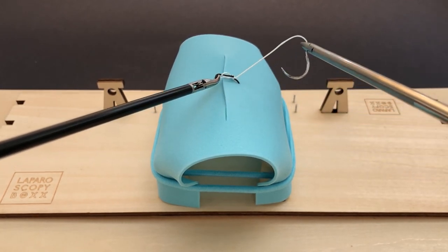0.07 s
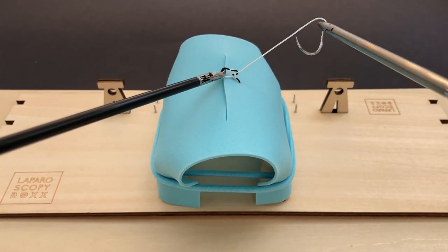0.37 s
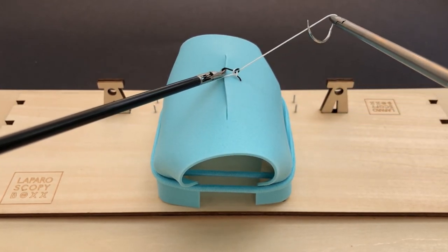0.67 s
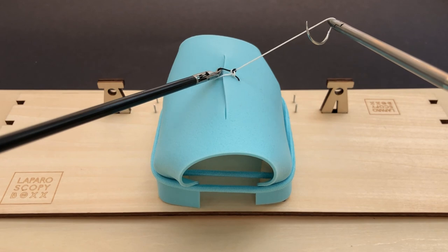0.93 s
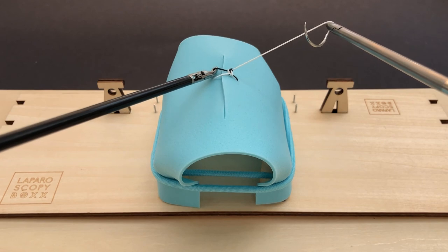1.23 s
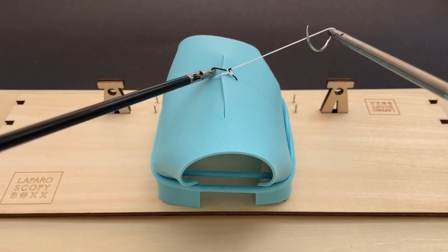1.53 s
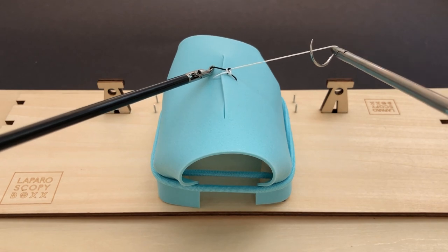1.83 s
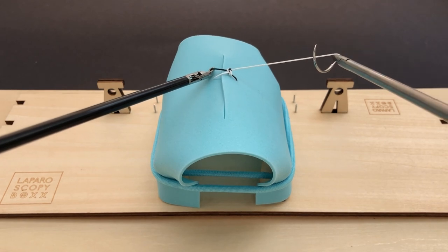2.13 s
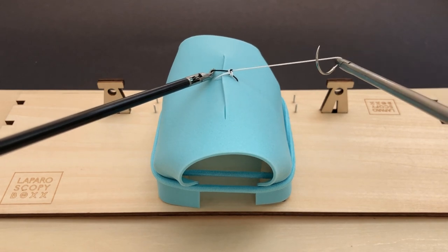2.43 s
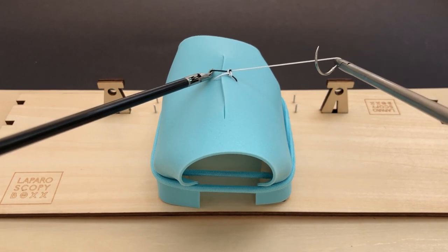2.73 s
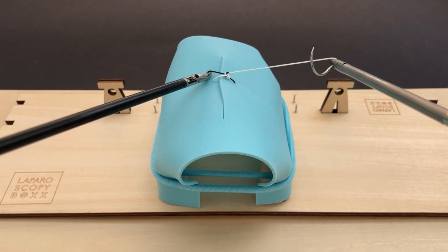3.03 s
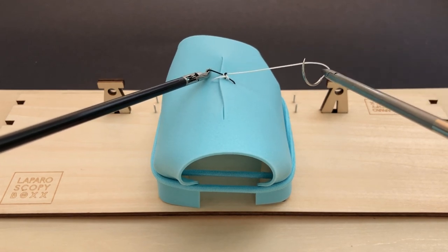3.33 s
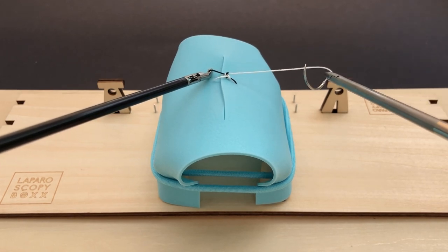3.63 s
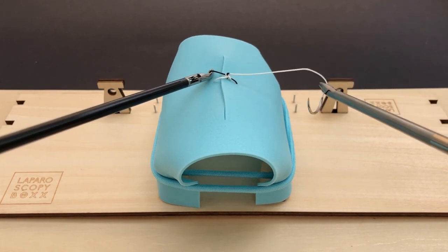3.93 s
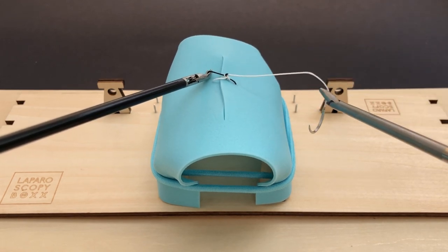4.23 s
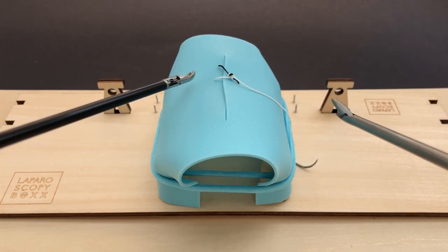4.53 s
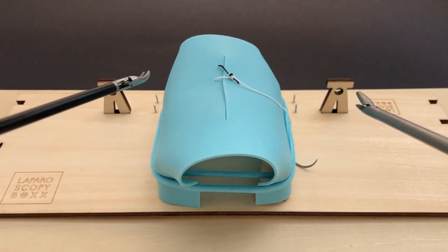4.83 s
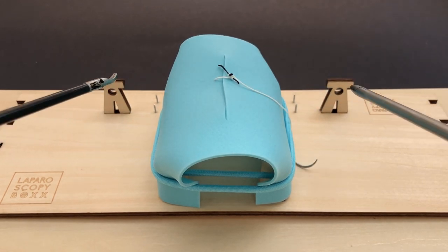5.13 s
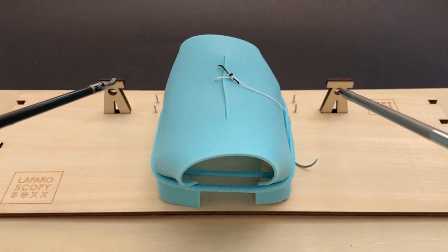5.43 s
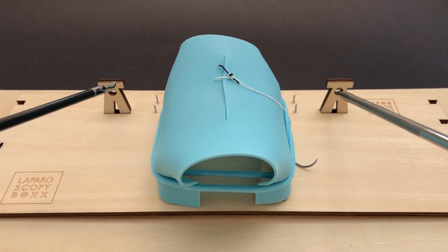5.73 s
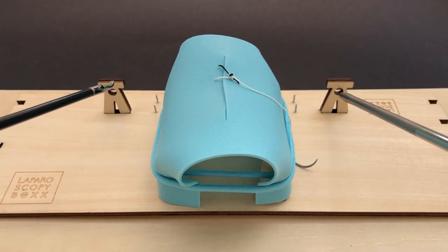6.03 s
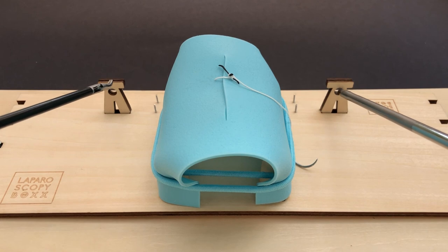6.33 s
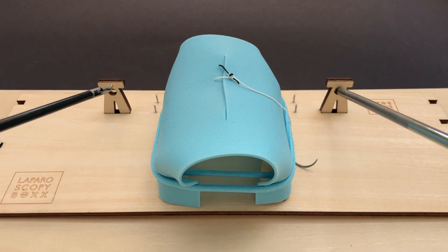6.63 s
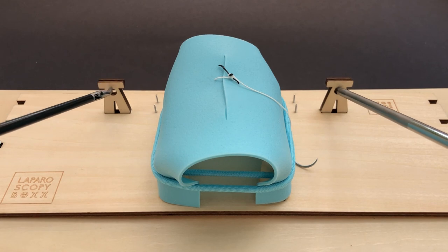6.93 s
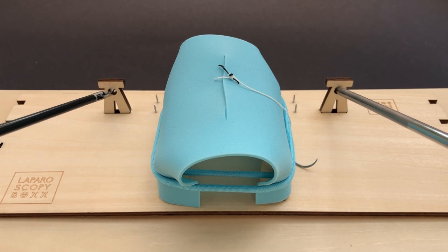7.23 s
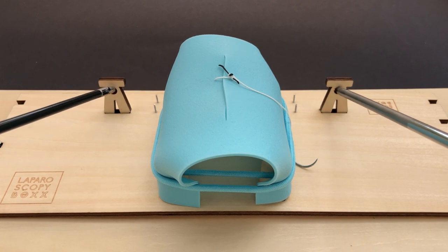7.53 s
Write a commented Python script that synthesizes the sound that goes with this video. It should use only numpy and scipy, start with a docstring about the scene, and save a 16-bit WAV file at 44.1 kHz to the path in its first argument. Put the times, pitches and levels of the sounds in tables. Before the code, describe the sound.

A low room rumble and faint hum run throughout, with the soft hiss of steel instrument shafts gliding in the ports of a small training box. Between about 1 and 1.6 seconds come three quiet, hollow knocks, light taps and two small, scratchy ratchet clicks, slightly distant and briefly ringing. From 2.4 to 4 seconds there are only tiny rubs, knocks and high joint clinks while the hum swells a little.

At 4.5 seconds a needle holder's jaws spring open with a sharp, bright metallic snap, close and dry, by far the loudest event. It rebounds three times, quickly fading. Around 5.3 seconds a clearer ratchet click sounds farther off, with a hollow knock and a faint sliding hiss. From 6.5 seconds to the end near 7.6 seconds, light taps, dull rubs and a soft, uneven drag come from the shafts.

```python
"""A faint hiss and tick of steel shafts gliding in their ports, over low room rumble and hum.
Two long instruments tighten a knot on a rubber pad: the shafts knock, rub and drag, the joints clink,
and the handle ratchets catch farther off. At 4.5 s the needle holder's jaws spring open with a sharp,
close snap, the loudest event, and rebound three times."""
import sys
import numpy as np
from scipy import signal
from scipy.fft import irfft
from scipy.io import wavfile

SR = 44100
rng = np.random.default_rng(int(sys.argv[2]) if len(sys.argv) > 2 else 0)


def generate_wav(signal):
    """Clip the signal to [-1, 1] and save it as 16-bit WAV at the path in sys.argv[1]."""
    frames = np.transpose(np.atleast_2d(signal))
    scaled = np.clip(frames, -1, 1) * 32767
    pcm = np.round(scaled).astype(np.int16)
    wavfile.write(sys.argv[1], SR, pcm)


N = 334719

# jaw snap and rebounds: t/s, level/dB, contact cut-off/Hz
JAW_HITS = [(4.5267, 6.5, 16000), (4.6063, -6, 6580), (4.6470, -14, 4550), (4.6651, -21, 4500)]
# jaw and shaft resonances: f/Hz, nominal width/Hz, relative level/dB
JAW_MODES = [(810, 59, -23.5), (1495, 180, -13.5), (2665, 380, -8), (3420, 150, -2.5), (3930, 300, -7),
             (4930, 800, -4.5), (5650, 390, -17.5), (6796, 500, -11), (7320, 340, -7.5), (9140, 280, -7),
             (11170, 420, -9.5), (13140, 700, -13.5), (13100, 300, -11), (15500, 540, -16.5)]
# tooth catches: t/s, scrape/dB, bounce delay/s, bounce/dB re scrape, steel/dB, frame/dB, pitch ratio
RATCHET_CATCHES = [(1.3006, -38, .0095, -10, -54, -63.5, 0.98), (1.5707, -38, .0034, -7, -55, -60, 0.97),
                   (5.2832, -30.5, .0052, -11, -48, -50, 1.115)]
# tooth scrape spectrum: f/Hz, relative level/dB
TOOTH_SPECTRUM = [(200, -14), (750, -6), (1500, -12), (2500, -9.5), (3700, -1), (5500, -8), (7300, -3.5),
                  (8800, 1), (9600, 3.5), (10300, 3), (12000, -6.5), (14000, 0), (16000, -20)]
# bright handle modes: f/Hz, relative level/dB, T60/s
STEEL_MODES = [(3800, -14, .4), (4700, -13, .3), (7300, -12, .22), (8560, -4, .22), (8775, -5, .25),
               (8880, -1, .32), (9012, 0, .38), (10030, -5, .19), (10270, -4, .19), (12400, -10, .25)]
# low handle and shaft modes: f/Hz, relative level/dB, T60/s
FRAME_MODES = [(241.5, -3, 0.3), (544, -7.5, 0.47), (670, -11, 0.13), (904, 6, 0.086), (925, -14, 0.59),
               (1275, 1.5, 0.084), (1598, -6.5, 0.23), (2007, -8, 0.22)]
# hollow shaft knocks: t/s, level/dB, f/Hz
PORT_KNOCKS = [(1.211, -45, 473), (1.303, -45.5, 584), (1.395, -46.5, 468), (2.811, -60, 612),
               (2.969, -58.5, 470), (4.99, -53.5, 595), (5.318, -43, 534), (7.318, -59, 473)]
# light ticks: shaft taps, and brighter joint ticks at 7.04-7.22 s: t/s, level/dB, f/Hz, half-width/oct
TICKS = [(0.154, -62, 2000, 1), (1.051, -56.5, 1110, 0.63), (1.208, -60, 870, 0.75),
         (1.391, -56.5, 836, .4), (2.811, -61, 1090, 1.1), (4.488, -48, 1135, 0.66),
         (4.4987, -53, 6500, .9), (5.167, -61.5, 1503, 0.78), (6.5076, -55, 1700, 1.22),
         (7.043, -65, 3500, 1.15), (7.1075, -63.5, 4410, .5), (7.2214, -61.5, 2680, 1.02),
         (7.5406, -55.5, 1620, 0.59)]
# joint clinks: t/s, level/dB, f/Hz
JOINT_PINGS = [(1.4862, -67, 8800), (3.2272, -68.5, 6600), (3.337, -61, 7500), (4.056, -62.5, 9100)]
# shaft turns: t/s, length/s, level/dB
PORT_RUBS = [(-.01, 0.07, -73), (1.542, .06, -66.5), (2.383, 0.051, -69), (2.559, 0.032, -71.5),
             (4.97, 0.033, -65.5), (6.543, 0.075, -68), (7.023, 0.041, -72.5), (7.547, .06, -71)]
# binding strokes: t/s, rise/s, hold/s, release/s, level/dB
DRAG_STROKES = [(6.528, .03, 0.026, 0.05, -74), (7.265, 0.038, .3, .05, -71)]
# binding friction spectrum: f/Hz, relative level/dB
DRAG_SPECTRUM = [(300, -14), (620, 7.5), (1000, -4.5), (1500, -5.5), (2800, -9), (3700, 0), (4400, -7),
                 (5200, 2.5), (5900, -12), (12000, -24)]
# smooth strokes: t/s, rise/s, hold/s, release/s, level/dB
GLIDE_STROKES = [(-.1, .3, .1, .14, -69.5), (0.634, .11, 0.043, 0.2, -71),
                 (3.076, 0.054, 0.019, .05, -71.5), (4.272, 0.067, .03, 0.26, -72),
                 (4.614, 0.14, 0.069, 0.071, -67.5), (4.866, 0.08, 0.38, 1, -66)]
# gliding tube spectrum: f/Hz, relative level/dB
GLIDE_SPECTRUM = [(250, -9), (600, 5), (1100, -1), (2200, -2.5), (3200, -8), (3600, -3.5), (3870, 6),
                  (4200, -7), (5300, -4), (6900, 0.5), (8200, -4.5), (10000, -11), (10900, -1), (12000, -8),
                  (14100, -3.5), (16000, -4)]
# room air spectrum: f/Hz, relative level/dB
AIR_SPECTRUM = [(15, -55), (25, -27), (55, -4.5), (120, -9), (190, -5), (240, -5), (320, -11), (575, -18.5),
                (820, -24), (1600, -29.5), (2600, -33), (9000, -36), (12500, -39.5), (16000, -49)]
# hum swells: t/s, rise/s, hold/s, release/s, level/dB before trim
HUM_RISES = [(2.4, .45, .4, .65, -63), (6.3, .9, .4, .3, -70)]
# room decay: f/Hz, T60/s
ROOM_DECAY = [(200, 0.4), (1000, 0.54), (3500, .52), (6000, 0.45), (9000, 0.39), (15000, 0.25)]


def jaw_snaps(blur=.92, skirt=1.3, travel_s=.0011, size=4096):
    """Blows excite the jaw resonances (widths times blur); bending waves deliver the treble first."""
    out, hz = np.zeros(N), abs(np.fft.fftfreq(size, 1 / SR))
    half = size // 2 + 1
    power = sum(amp(db) ** 2 / (1 + ((hz - mode_hz) / (blur * width_hz / 2)) ** 2) ** skirt
                for mode_hz, width_hz, db in JAW_MODES)
    power = power * hz ** 2 / (hz ** 2 + 900 ** 2)  # thin steel radiates little bass
    dispersion = np.sqrt(4000 / (hz + 500)) * np.clip((16000 - hz) / 10000, 0, 1)  # 1 at 3.5 kHz
    lag_rad = 2 * np.pi * np.cumsum(travel_s * dispersion[:half]) * SR / size
    for start_s, db, cut_hz in JAW_HITS:
        log_gain = np.log(power / (1 + (hz / cut_hz) ** 6) + 1e-9) / 2
        spectrum = np.exp(np.conj(signal.hilbert(log_gain)))[:half]  # minimum phase
        click = irfft(spectrum * np.exp(-1j * lag_rad))[:half]
        add(out, start_s, amp(db) * click / np.linalg.norm(click))
    return out


def ratchet(scrape_s=.0049, rattle_s=.034, rattle_db=-15, swell_s=.0037):
    """Each tooth scrapes, bounces once, rattles the handle and rings it; returns scrapes, rings."""
    scrapes, rings, t = np.zeros(N), np.zeros(N), np.arange(SR // 2) / SR
    attack = 1 - np.exp(-t / .0001)
    burst = attack * (np.exp(-t / scrape_s) + amp(rattle_db) * np.exp(-t / rattle_s))
    for start_s, db, bounce_s, bounce_db, steel_db, frame_db, pitch in RATCHET_CATCHES:
        for hit_s, hit_db in (start_s, db), (start_s + bounce_s, db + bounce_db):
            grit = noise(lambda hz: read(TOOTH_SPECTRUM, hz / pitch), len(t))
            add(scrapes, hit_s, amp(hit_db) * grit * burst)
        steel = amp(steel_db) * ring(STEEL_MODES, t) * attack
        frame = amp(frame_db) * ring(FRAME_MODES, t) * (1 - np.exp(-t / swell_s))
        add(rings, start_s, steel + frame)
    return scrapes, rings


def knocks(swell_s=.0052, t60_s=.11):
    """A shaft bumps its port; one low resonance swells and dies."""
    out, t = np.zeros(N), np.arange(SR // 2) / SR
    for start_s, db, hz in PORT_KNOCKS:
        add(out, start_s, ring([(hz, db, t60_s)], t) * (1 - np.exp(-t / swell_s)))
    return out


def ticks():
    """A shaft taps its port or a joint ticks: short noise bursts, narrower ones ringing longer."""
    out, t = np.zeros(N), np.arange(SR // 4) / SR
    for start_s, db, centre_hz, half_oct in TICKS:
        decay_s = .0036 / half_oct ** .4
        envelope = np.exp(-t / decay_s) * (1 - np.exp(-t / .0001))
        add(out, start_s, amp(db) * hump(centre_hz, half_oct, len(t)) * envelope)
    return out


def pings(overtone_ratio=1.47, overtone_db=-5, decay_s=.011, contact_db=4.5, contact_s=.0036):
    """A bright contact briefly rings two high resonances of a joint."""
    out, t = np.zeros(N), np.arange(SR // 4) / SR
    for start_s, db, hz in JOINT_PINGS:
        low = band(hz, half_hz=415, size=len(t))
        high = band(hz * overtone_ratio, half_hz=415, size=len(t))
        ringing = (low + amp(overtone_db) * high) * np.exp(-t / decay_s)
        contact = hump(centre_hz=6500, half_oct=1, size=len(t)) * np.exp(-t / contact_s)
        add(out, start_s, amp(db) * (amp(contact_db) * contact + ringing))
    return out


def rubs(rise_share=.31):
    """A shaft turns in its port: dull, grainy friction that swells fast and fades."""
    envelope = sum(stroke(start_s, rise_share * length_s, 0, (1 - rise_share) * length_s, db)
                   for start_s, length_s, db in PORT_RUBS)
    friction = grip(grain_db=2.5, slip_hz=120) * hump(centre_hz=1100, half_oct=.9)
    return envelope * unit(friction)


def drags():
    """A shaft binds in its port, catching unevenly."""
    envelope = sum(stroke(*row) for row in DRAG_STROKES)
    friction = grip(grain_db=4, slip_hz=110) * noise(lambda hz: read(DRAG_SPECTRUM, hz))
    return envelope * unit(friction)


def glides(speed_exponent=1.4):
    """Smooth friction hisses through the tube's resonances, louder with speed."""
    envelope = sum(stroke(*row, speed_exponent) for row in GLIDE_STROKES)
    friction = grip(grain_db=1.35, slip_hz=30) * noise(lambda hz: read(GLIDE_SPECTRUM, hz))
    return envelope * unit(friction)


def room_air(level_db=-68, split_hz=600, drift_db=1, drift_hz=.6):
    """Still air: an even hiss over a rumble whose level drifts."""
    air = amp(level_db) * noise(lambda hz: read(AIR_SPECTRUM, hz))
    rumble = signal.sosfilt(signal.butter(1, split_hz, fs=SR, output="sos"), air)
    hiss = air - rumble
    drift = amp(drift_db * band(1, drift_hz))
    return hiss + drift * rumble


def hum(hz=67.4, waver_hz=3, waver_depth=.7, floor_db=-77, trim_db=-3):
    """A low, wavering tone that swells twice."""
    tone = np.sin(2 * np.pi * hz * np.arange(N) / SR) + waver_depth * band(hz, waver_hz)
    envelope = amp(floor_db) + sum(stroke(*row) for row in HUM_RISES)
    return amp(trim_db) * envelope * unit(tone)


def room(send, first_s=.004, early_db=3, early_s=.0041, dull_hz=11000):
    """Dense reflections of random sign, strongest early; treble dies first."""
    t = np.arange(SR) / SR
    taps = rng.choice([-1., 1.], SR) * (rng.random(SR) < .2) * (t > first_s)
    taps *= 1 + amp(early_db) * np.exp(-t / early_s) / 2
    hz, age_s, spectra = signal.stft(taps, SR, nperseg=256)
    decay = amp(-60 * age_s / read(ROOM_DECAY, hz)[:, None])
    lowpass = 1 / np.sqrt(1 + (hz[:, None] / dull_hz) ** 2)
    tail = signal.istft(spectra * decay * lowpass, SR, nperseg=256)[1]
    return signal.fftconvolve(send, tail / np.linalg.norm(tail))[:N]


def ring(modes, t):
    """Decaying modes struck from rest, alternating in sign."""
    return sum((-1) ** k * amp(db - 60 * t / t60_s) * np.sin(2 * np.pi * hz * t)
               for k, (hz, db, t60_s) in enumerate(modes))


def stroke(start_s, rise_s, hold_s, release_s, db, exponent=1):
    """Scene-long gain: one rise, hold and release."""
    t = np.arange(N) / SR - start_s
    ramp = np.clip(np.minimum(t / rise_s, 1 - (t - rise_s - hold_s) / release_s), 0, 1)
    return amp(db) * ramp ** exponent


def grip(grain_db, slip_hz):
    """Random gain of uneven friction."""
    return amp(grain_db * band(0, slip_hz))


def band(centre_hz, half_hz, size=N):
    """Noise peak, 6 dB down at half_hz from centre."""
    return noise(lambda hz: -20 * np.log10(1 + ((hz - centre_hz) / half_hz) ** 2), size)


def hump(centre_hz, half_oct, size=N):
    """Flat-topped noise band in log frequency."""
    return noise(lambda hz: -16 * np.log10(1 + (np.log2(hz / centre_hz) / half_oct) ** 4), size)


def noise(spectrum_db, size=N):
    """Unit-rms noise shaped by spectrum_db(hz)."""
    hz = np.fft.rfftfreq(size, 1 / SR) + 1
    phasors = np.exp(2j * np.pi * rng.random(len(hz)))
    return unit(irfft(amp(spectrum_db(hz)) * phasors, size))


def read(points, hz):
    """Interpolate in log frequency."""
    points_hz, values = np.transpose(points)
    return np.interp(np.log(hz + 1), np.log(points_hz + 1), values)


def add(mix, start_s, sound):
    """Mix in at start_s."""
    part = mix[round(start_s * SR):][:len(sound)]
    part += sound[:len(part)]


def amp(db):
    """dB to gain."""
    return 10 ** (np.asarray(db) / 20)


def unit(x):
    """Scale to rms 1."""
    return x / np.sqrt(np.mean(x ** 2) + 1e-20)


def scene(snap_send_db=-15.5, scrape_send_db=-9, contact_send_db=-8, ring_send_db=-17):
    """Mono mix: jaws close and dry, ratchet scrapes farther off and wetter."""
    scrapes, rings = ratchet()
    bed = room_air() + hum() + glides()
    contacts = drags() + rubs() + ticks() + pings()
    ringing = rings + knocks()
    diffuse_snaps = jaw_snaps(blur=6.9)  # summed over all directions, the resonances blend
    send = (amp(snap_send_db) * diffuse_snaps + amp(scrape_send_db) * scrapes
            + amp(contact_send_db) * contacts + amp(ring_send_db) * ringing)
    return (jaw_snaps() + scrapes + contacts + ringing + room(send) + bed)[None]


def record(dry):
    """Low-pass at 16 kHz."""
    lowpass = signal.firwin(255, 16000, window=("kaiser", 9), fs=SR)
    return signal.oaconvolve(dry, lowpass[None], "same")


dry = scene()
out = record(dry)
generate_wav(out)
```